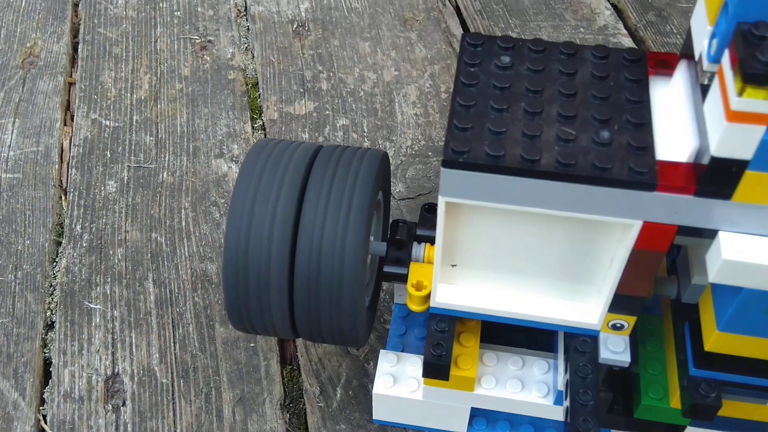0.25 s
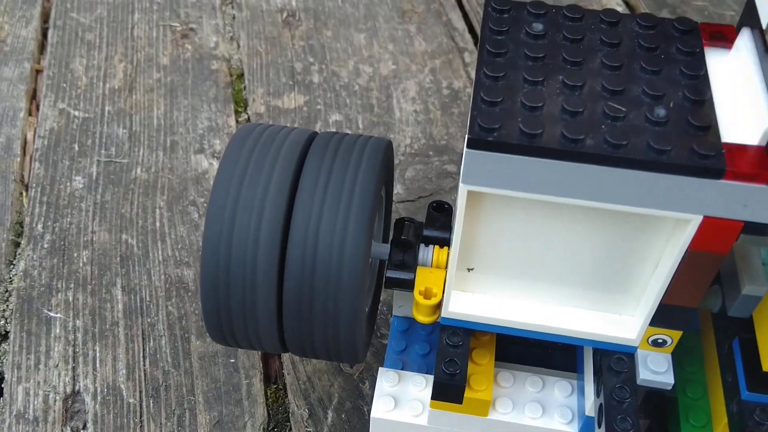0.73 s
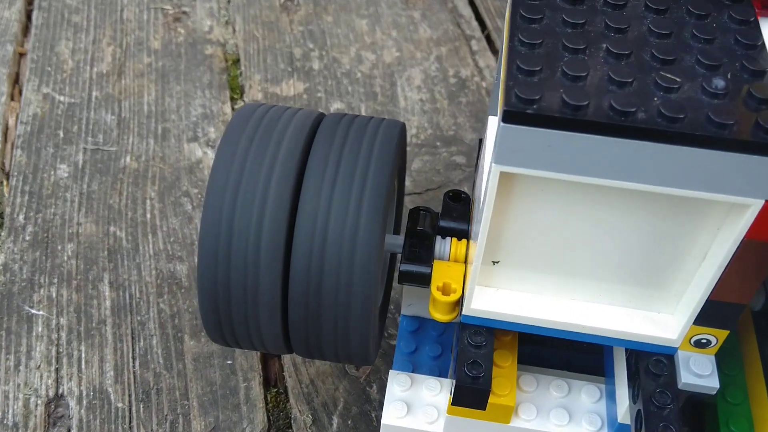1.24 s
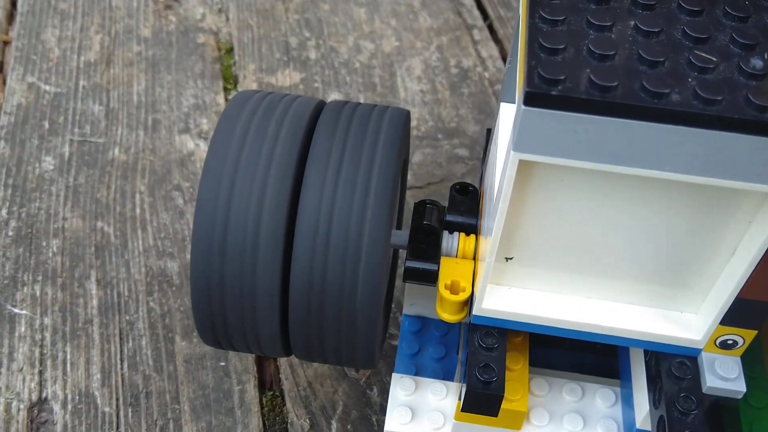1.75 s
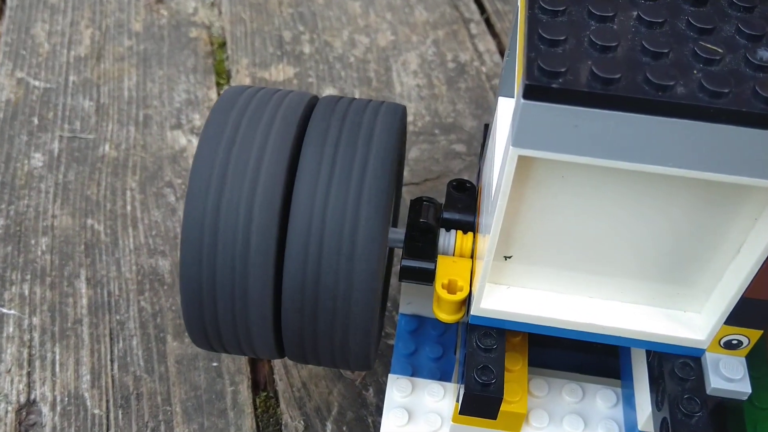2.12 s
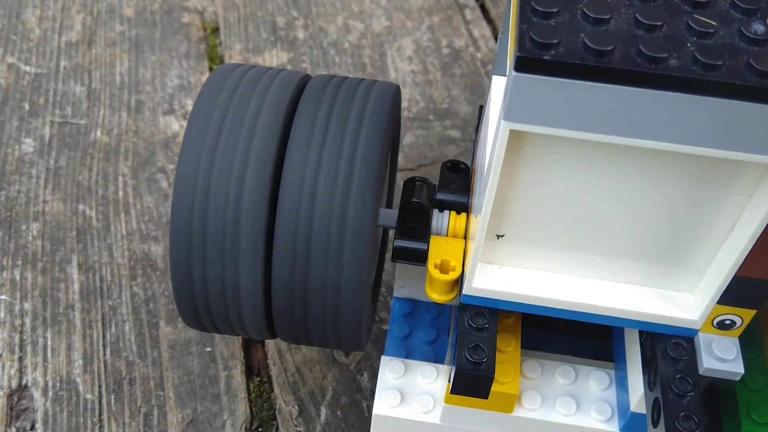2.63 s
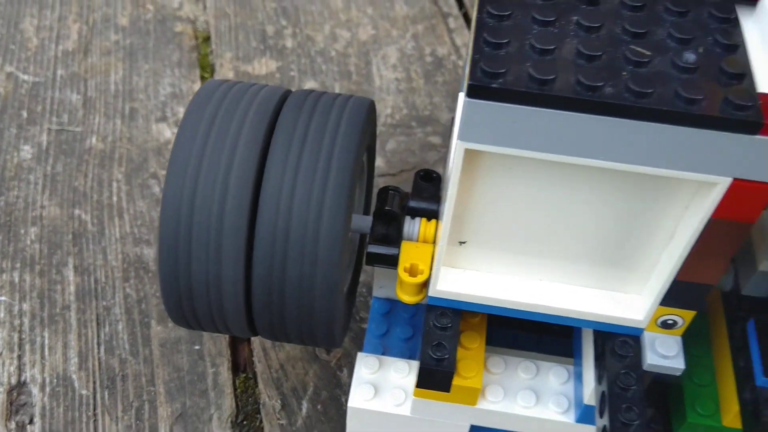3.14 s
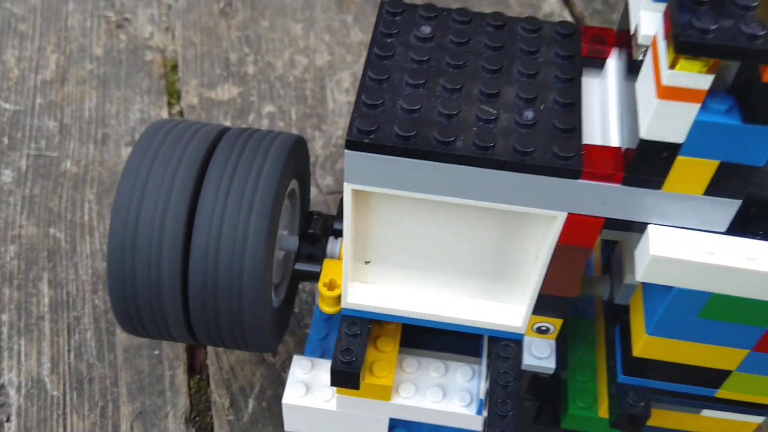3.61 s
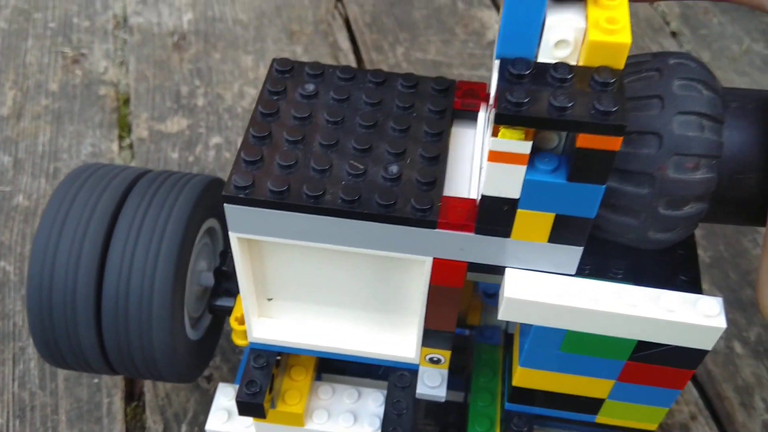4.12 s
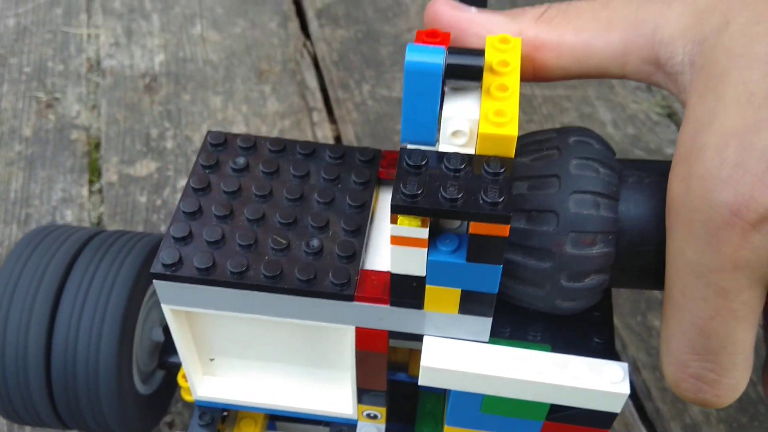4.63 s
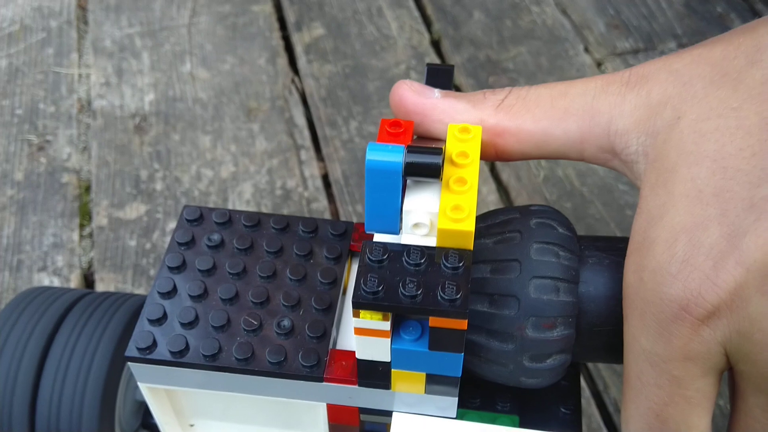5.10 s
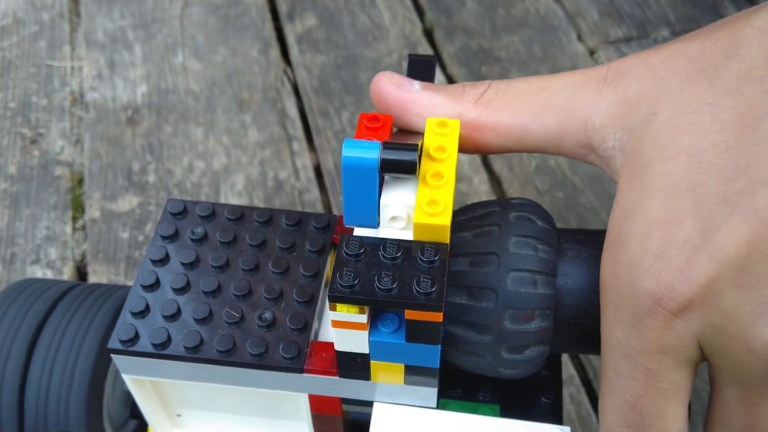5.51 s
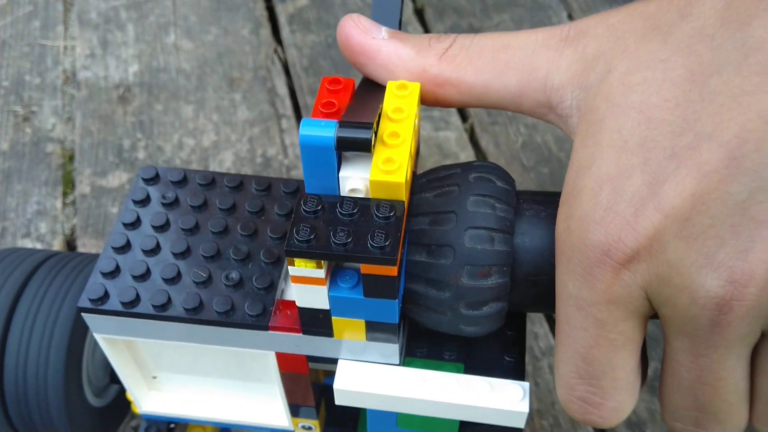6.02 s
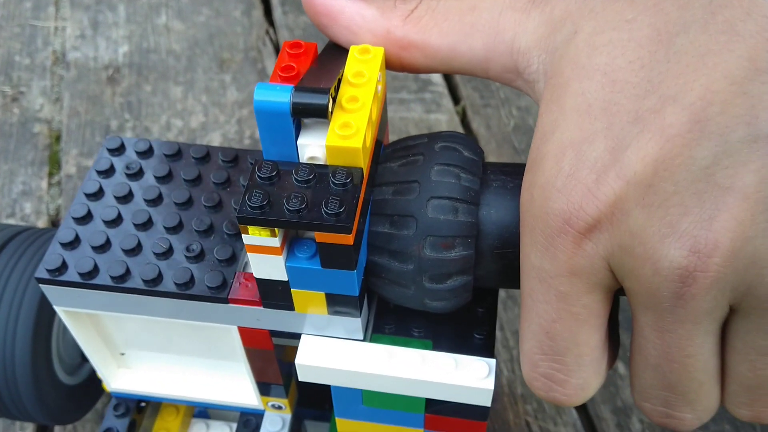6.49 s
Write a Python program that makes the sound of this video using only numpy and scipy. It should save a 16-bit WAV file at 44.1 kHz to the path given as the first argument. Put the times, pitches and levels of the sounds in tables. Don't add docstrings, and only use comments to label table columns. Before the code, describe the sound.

A small plastic-brick suction engine clatters over loud hissing air, slows to a heavy flutter, then speeds back into a fast buzz outdoors.

```python
import sys
import numpy as np
from scipy import signal
from scipy.fft import rfft, irfft, next_fast_len
from scipy.io import wavfile
from scipy.ndimage import uniform_filter1d, minimum_filter1d, map_coordinates

SR = 44100
rng = np.random.default_rng(int(sys.argv[2]) if len(sys.argv) > 2 else 0)


def amplitude_ratio(level_db):
    exponent = np.asarray(level_db, float) / 20
    return 10 ** exponent


def inscribe(sig):
    pcm = np.round(np.clip(np.atleast_2d(sig).T, -1, 1) * 32767)
    wavfile.write(sys.argv[1], SR, pcm.astype(np.int16))


N = 297675

# time_s, place (0 flywheel to 1 valve), left_port_lag_samples
MICROPHONE_PATH = [(0, 0.48, 0.5), (.5, 0.5, 2), (1, .02, 3.5), (1.7, 0.028, 4), (2.5, 0.014, 4.5),
                   (3.25, 0.31, 4), (3.6, 0.59, 0.84), (4, 1, -0.5), (4.3, 1, -3.5), (4.8, 0.9, -4),
                   (5.5, 0.84, -5.5), (6.1, 0.88, -6), (6.75, 0.91, -6)]
LOUDNESS = {"rumble": (-48, 0.2, 0.86, -2, 0.1), "chuff": (-36.5, -0.2, 1.5, -0.05, 0.08),
            "rush": (-24, 0.34, 0.98, -1.16, -0.05), "low jet": (-16, 0.53, 0.57, -5, 0.15),
            "middle jet": (-20.5, 1.01, .08, -3.3, 0.11), "high jet": (-22, 1.21, 0.18, -2, 0.12),
            "hiss": (-31.5, 0.95, 0.3, 0.9, 0.3), "top hiss": (-26.5, 0.5, -0.15, -4.4, 0.07),
            "knock": (-37.5, -0.6, .5, 1, 0.3)}


def rms_one(x):
    return x / np.sqrt(np.mean(x ** 2) + 1e-20)


def in_time(rows):
    time_s, *columns = np.transpose(rows)
    return [np.interp(np.arange(N) / SR, time_s, column) for column in columns]


def drift(rate):
    pole = np.exp(-80 * np.pi * rate / SR)
    noise = rng.standard_normal(N // 40 + 2002)
    slow = signal.lfilter([1], [1, -2 * pole, pole * pole], noise)[2000:]
    return np.interp(np.arange(N) / 40, np.arange(len(slow)), rms_one(slow - slow.mean()))


def once_a_turn(turns, at, sharp):
    bump = np.exp(sharp * (np.cos(2 * np.pi * (turns - at)) - 1))
    return bump - bump.mean()


def controls():
    # time_s, leak_and_valve_db, cylinder_db
    flow = [(0, -20.5, -25.5), (.19, -18.5, -29.5), (.45, -19.5, -30.5), (.69, -17, -30), (.82, -19, -31),
            (1.25, -19, -30.5), (1.55, -19.5, -31.5), (2.18, -19, -30.5), (2.29, -22, -30.5),
            (2.39, -22, -25.5), (3.2, -22.5, -25), (3.44, -24, -24), (3.7, -26.5, -25.5),
            (3.87, -28, -31.5), (4.6, -27.5, -28.5), (5.6, -30.5, -30.5), (5.88, -26, -28),
            (6.75, -22.5, -27)]
    # time_s, high_jet_left_over_right_db
    jet_shift = [(0.0, 2), (0.15, 3), (0.28, -11), (0.47, 8), (0.58, -4.5), (0.66, 6), (0.75, -5), (0.86, 12),
                 (1.07, 3), (1.14, 7.5), (2.24, 6.5), (2.33, -3), (2.69, 8), (4.32, 9), (4.59, -9), (4.77, 2.5),
                 (5.79, 0.5), (6.75, -6.5)]
    leak_db, cylinder_db = in_time(flow)
    leak_swing, cylinder_swing = leak_db + 22, cylinder_db + 28
    return np.array([np.ones(N), leak_swing, cylinder_swing, *in_time(MICROPHONE_PATH), *in_time(jet_shift)])


def air_bands(place, patchy_db, together_db):
    # frequency_hz,
    # flywheel_left_db_per_hz, flywheel_right_db_per_hz, valve_left_db_per_hz, valve_right_db_per_hz
    air_colour = [(32, -44, -44, -44, -44), (43, -36, -39, -38, -40), (64, -26.5, -29, -17, -28),
                  (75, -29, -32, -29, -32), (270, -34.5, -33.5, -33, -32.5), (380, -29, -32, -27, -29),
                  (660, -26, -23.5, -17, -20), (750, -22, -25.5, -19, -22.5),
                  (1140, -22, -16.5, -18, -17.5), (1730, -19.5, -17, -14.5, -10.5),
                  (1920, -18, -10, -21, -20),
                  (2280, -14.5, -17, -22.5, -27), (2560, -9, -14, -17, -19), (2780, -9, -7, -12.3, -15.5),
                  (3273, -8.3, -4, -9.8, -13.5), (3480, -8, -5.5, -12, -16.3),
                  (3703, -11, -9.3, -19.5, -22), (4048, -14, -9.7, -18.5, -21.5),
                  (4392, -13.3, -5.8, -14.5, -17.3), (4651, -8.2, -7.8, -15.5, -15.2),
                  (5081, -8, -15.5, -17.9, -15.2), (5570, -4, -8.5, -18.5, -19.3),
                  (5943, -11.3, -16.7, -23, -21.5), (6287, -12.8, -18, -23.7, -22.1),
                  (6718, -20.6, -17.1, -24.2, -26.1),
                  (6890, -20.6, -18.5, -24.7, -27.0), (7924, -23.9, -22.2, -24.6, -30.5),
                   (8441, -25.7, -22.9, -29.0, -30.7), (9130, -25.4, -24.8, -30.0, -32.8),
                   (9991, -25.5, -22.9, -27.8, -30.6), (11197, -25.8, -24.1, -30.5, -30.2),
                   (11886, -21.7, -23.4, -31.0, -28.2), (13264, -23.1, -23.9, -28.8, -28.8),
                   (13953, -25.7, -28.4, -33.1, -32.4), (15331, -29.5, -28.6, -34.6, -34.5),
                   (15503, -30.3, -29.9, -35.3, -35.0), (15676, -33.7, -33.6, -38.2, -38.0)]
    # frequency_hz, flywheel_likeness, valve_likeness (both 0 to 1),
    # flywheel_phase_rad, valve_phase_rad
    likeness = [(40, .9995, .9995, 0, 0), (300, .975, .99, -.05, 0), (1000, .95, .96, -.2, -.1),
                (1700, .91, .93, -.3, -.3), (2300, .8, .72, 1.1, -.6), (2800, .85, .88, .3, .4),
                (3400, .83, .88, .1, .1), (4100, .7, .84, .6, .5), (4700, .65, .7, .7, .7),
                (5200, .5, .4, -.4, -1), (5800, .65, .45, -1.2, -.8), (6800, .55, .45, -.8, -.7),
                (9000, .55, .55, -1.2, -1), (15000, .4, .45, -3.8, -3.6)]
    band_edges_hz = [30, 200, 320, 520, 900, 1250, 1700, 2300, 2750, 3100, 3550, 4100, 4600, 5100, 5450,
                     5900, 6800, 8000, 9500, 11200, 13000, 16500]
    size = next_fast_len(N)
    log_hz = np.log(np.maximum(np.arange(size // 2 + 1) * SR / size, 1))
    table = np.array(air_colour)
    table = table[np.argsort(table[:, 0])]
    colour = amplitude_ratio([np.interp(log_hz, np.log(table[:, 0]), column) for column in table[:, 1:].T])
    at_hz, *pair = np.transpose(likeness)
    pair = np.array([np.interp(log_hz, np.log(at_hz), column) for column in pair])
    shared, left, right = rfft(rng.standard_normal((3, size)))
    ports = []
    for alike, phase in zip(pair[:2], pair[2:]):
        common, own = np.sqrt(alike) * shared, np.sqrt(1 - alike)
        ports.append(common * np.exp(-1j * phase) + own * left)
        ports.append(common + own * right)
    edges = np.log(band_edges_hz)
    gusts = drift(17.0) + 1.44 * drift(20.6)
    bands = []
    for low, high in zip(edges, edges[1:]):
        above_low = np.clip((log_hz - low) / .06 + .5, 0, 1)
        above_high = np.clip((log_hz - high) / .06 + .5, 0, 1)
        views = irfft((above_low - above_high) * colour * ports, size)[:, :N]
        rms = np.sqrt(np.mean(views ** 2, axis=1, keepdims=True))
        flicker = amplitude_ratio(patchy_db * (drift(2.44) + 0.26 * drift(12.0)) + together_db * gusts)
        sound = flicker * ((1 - place) * views[:2] + place * views[2:])
        bands.append((sound, (1 - place) * rms[:2] + place * rms[2:]))
    return bands


def layer(bands, name, now, beat_db):
    lean = {"chuff": (2.1, -0.8, -0.35, -0.14), "rush": (1.5, -0.27, -0.44, -0.034),
            "low jet": (-1, 0.76, -0.61, .09), "middle jet": (-0.79, -2.1, -0.79, 0.43),
            "high jet": (.01, .01, .01, 0.9), "hiss": (0.8, 0.5, -0.53, -0.1),
            "top hiss": (0.66, -0.82, -0.14, 0.014)}
    norm = np.sqrt(sum(rms ** 2 for sound, rms in bands))
    left_db = np.dot(lean.get(name, np.zeros(4)), now[[0, 3, 4, 5]])
    level_db = np.dot(LOUDNESS[name], now[:5]) + beat_db
    port_gain = amplitude_ratio(level_db + left_db * np.array([[.5], [-.5]]))
    return sum(sound for sound, rms in bands) / norm * port_gain


def echoed(sound, echo_db):
    # time_s, left_delay_ms, right_delay_ms
    echo = [(0, .35, .22), (.6, .31, .24), (1, .55, .5), (1.5, .43, .6), (2.3, .41, .64), (3.1, .55, .6),
            (3.5, .6, .26), (4.1, .38, .38), (5, .36, .46), (6, .4, .42), (6.75, .38, .36)]
    late = [map_coordinates(port, [np.arange(N) - ms * SR / 1000], order=3, mode="nearest")
            for port, ms in zip(sound, in_time(echo))]
    return (sound + amplitude_ratio(echo_db) * np.array(late)) / np.sqrt(1 + amplitude_ratio(2 * echo_db))


def airflow(turns, place):
    # time_s, chuff_depth_db, choke_depth_db
    valve = [(0, -3.5, 2.5), (2.05, 0.5, 2), (2.4, -2.5, 1), (3.05, 10, -0.5), (3.75, 4.5, 2.5),
             (4.1, 6.5, 6), (4.75, 4.5, 3), (5.1, 1.2, 2.5), (5.45, 4, 5), (5.8, 2, 4), (6.15, 10, 1),
             (6.75, 7, 1.5)]
    now = controls()
    chuff_depth, choke_depth = np.abs(in_time(valve))
    bands = air_bands(place, patchy_db=0.78, together_db=0.48)
    uneven = turns + 0.032 * drift(6.5)
    judder = 0.13 * drift(80)
    puff = chuff_depth * (once_a_turn(uneven, at=0.94, sharp=0.6) + judder)
    choke = -choke_depth * once_a_turn(uneven, at=.34, sharp=1.9)
    opening = 3.5 * np.exp(-(np.arange(N) / SR / 0.097) ** 2)
    hiss = layer(bands[16:18], "hiss", now, 1.16 * choke)
    hiss = hiss + layer(bands[18:], "top hiss", now, 1.2 * choke)
    return (layer(bands[:1], "rumble", now, 1.8 * opening)[0]
            + layer(bands[1:4], "chuff", now, 1.66 * puff)
            + layer(bands[4:7], "rush", now, 0.62 * puff)
            + layer(bands[7:11], "low jet", now, 1.4 * place * choke + opening)
            + layer(bands[11:13], "middle jet", now, 1.3 * choke)
            + layer(bands[13:16], "high jet", now, 1.27 * choke - 0.98 * opening)
            + echoed(hiss, echo_db=-13))


def piston(turns):
    # time_s, level_db
    thump = [
        (0, -55),
        (.3, -60),
        (.7, -58),
        (1.2, -66),
        (2.4, -70),
        (2.75, -54),
        (3.1, -51),
        (4.5, -50),
        (6.75, -49),
    ]
    # crank_multiple, level_db
    thump_orders = [(1, -24), (2, 0), (3, 3), (4, -6), (5, -10), (6, -3), (7, -9), (8, -8)]
    lines = np.zeros(N)
    for k, level_db in thump_orders:
        lines += amplitude_ratio(level_db) * np.cos(2 * np.pi * k * (turns + 0.047 * (-1) ** (k // 2)))
    return np.sqrt(2) * amplitude_ratio(in_time(thump)[0] + .5 * drift(4.6)) * lines


def linkage(turns):
    # turn_share, level_db
    knocks = [
        (.88, -5),
        (1, -4.5),
        (.22, -9.5),
        (.56, -6.5),
    ]
    # frequency_hz, level_db, t60_s
    brick_modes = [(460, -7, 0.019), (633, -6, 0.016), (827, 1, 0.012), (1182, 2.5, 0.017),
                   (1733, 3.5, 0.012), (2930, -5, 0.013), (3460, 7.5, 0.014), (5030, 10, 0.0059)]
    # start_s, peak_db
    hard_knocks = [(0.074, -19), (0.101, -3), (0.209, -19.5), (0.245, -22), (0.354, -14), (0.438, -26),
                   (0.694, -17), (2.294, -20), (2.347, -8), (2.542, -14), (2.842, -3), (2.948, -12),
                   (3.017, -18), (3.14, 2), (3.182, 2), (3.252, -3), (3.306, -1), (3.784, -8), (4.095, -12),
                   (6.066, -16), (6.337, -19), (6.482, -10), (6.649, -16)]
    whole = np.arange(int(turns[-1]))
    wanted = np.concatenate([whole + share for share, db in knocks])
    wanted = wanted + .03 * rng.standard_normal(len(wanted))
    at = np.searchsorted(turns, wanted).clip(0, N - 1)
    usual_db = np.dot(LOUDNESS["knock"], controls()[:5]) + 1.85 * drift(5.2)
    blows_db = np.repeat([db for share, db in knocks], len(whole)) + usual_db[at] + 11.5
    at = np.append(at, [round(s * SR) for s, db in hard_knocks])
    blows_db = np.append(blows_db, [db - 15.5 for s, db in hard_knocks])
    draws = rng.standard_normal((len(at), len(brick_modes)))
    out = np.zeros(N)
    for k, (hz, level_db, t60) in enumerate(brick_modes):
        clicks = np.full(N, 1e-18)
        clicks[at] = amplitude_ratio(blows_db + level_db + 3.3 * draws[:, k])
        r, w = amplitude_ratio(-60 / (t60 * SR)), 2 * np.pi * hz / SR
        out += (-1) ** k * signal.lfilter([0, np.sin(w)], [1, -2 * r * np.cos(w), r * r], clicks)
    return out


def cleaner():
    # time_s, pitch_hz, level_db
    whine = [(0, 464, -45), (.5, 470, -47), (1, 475, -50), (1.6, 477, -51), (2.1, 479, -52),
             (2.5, 474, -46), (3, 471, -47), (3.5, 468, -46), (4, 466, -48), (5, 465, -48), (6, 462, -48),
             (6.75, 463, -46)]
    hz, level_db = in_time(whine)
    gain = np.sqrt(2) * amplitude_ratio(level_db + 2.2 + .6 * drift(6))
    return gain * np.sin(2 * np.pi * np.cumsum(hz + .5 * drift(8)) / SR)


def limited(sound):
    top, span = .9, round(.002 * SR)
    wanted = np.minimum(1, top / (np.abs(sound).max(axis=0) + 1e-9))
    return sound * uniform_filter1d(minimum_filter1d(wanted, span), span)


def scene():
    # time_s, speed_turns_per_s
    crank = [(0.0, 30.74), (0.3, 26.29), (0.6, 23.21), (1.0, 19.72), (1.4, 17.97), (1.8, 15.88),
             (2.1, 14.75), (2.35, 17.45), (2.6, 16.09), (3.2, 20.77), (3.5, 22.53), (3.8, 24.54),
             (4.1, 26.38), (4.5, 28.04), (5.0, 28.91), (5.5, 29.74), (6.0, 29.89), (6.75, 29.5)]
    turns = np.cumsum(in_time(crank)[0]) / SR
    place, lag = in_time(MICROPHONE_PATH)
    place = np.clip(place, 0, 1)
    engine = airflow(turns, place) + linkage(turns) + piston(turns)
    left = map_coordinates(engine[0], [np.arange(N) - lag], order=3, mode="nearest")
    return np.array([left, engine[1]]) + cleaner()


def band_limit(x):
    return signal.sosfilt(signal.butter(12, 16830, fs=SR, output="sos"), x)


def record(dry):
    top_cut = signal.ellip(16, .5, 62, 15745, fs=SR, output="sos")
    bass_cut = signal.butter(3, 38, "high", fs=SR, output="sos")
    cut = signal.sosfilt(bass_cut, signal.sosfilt(top_cut, limited(dry)))
    return band_limit(np.clip(cut, -1, 1))


dry = scene()
out = record(dry)
inscribe(out)
```